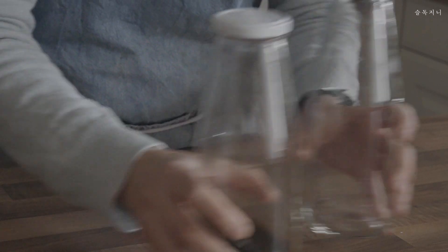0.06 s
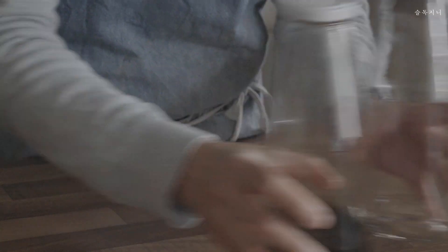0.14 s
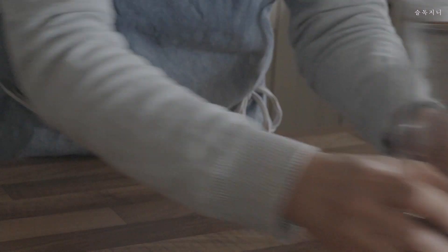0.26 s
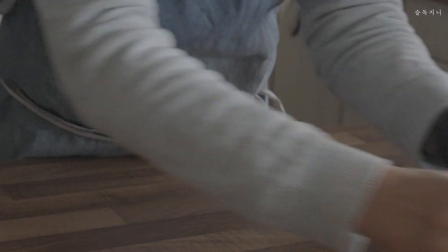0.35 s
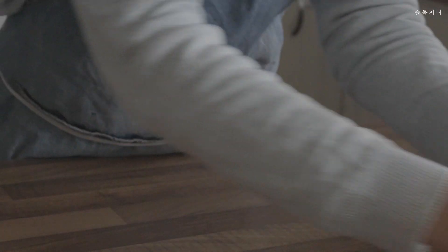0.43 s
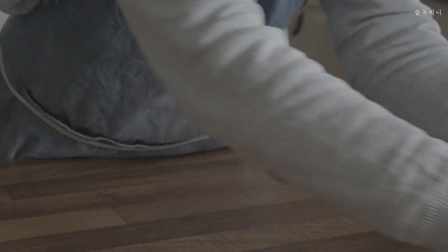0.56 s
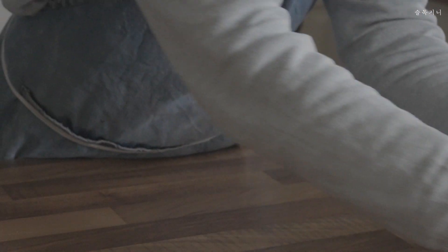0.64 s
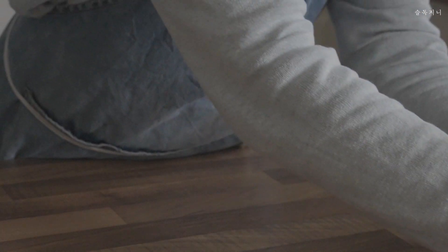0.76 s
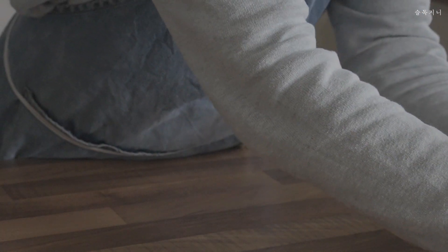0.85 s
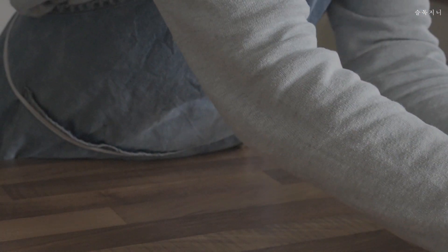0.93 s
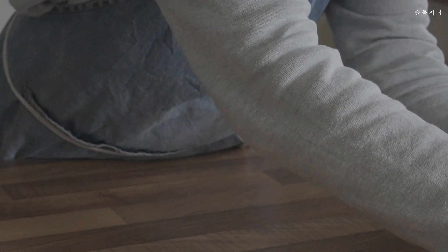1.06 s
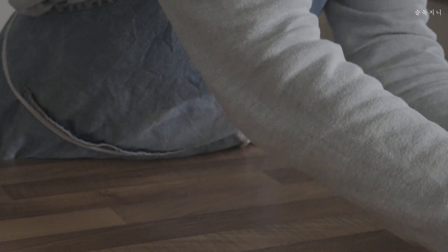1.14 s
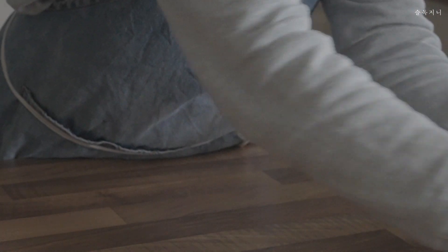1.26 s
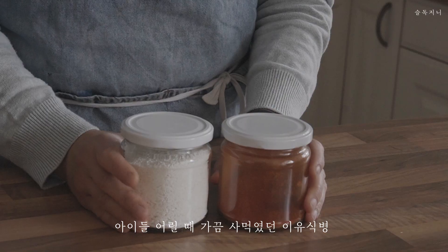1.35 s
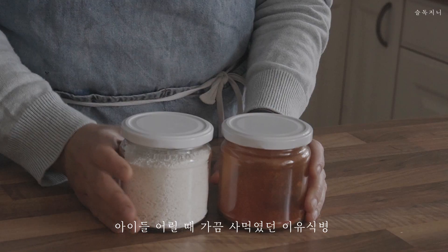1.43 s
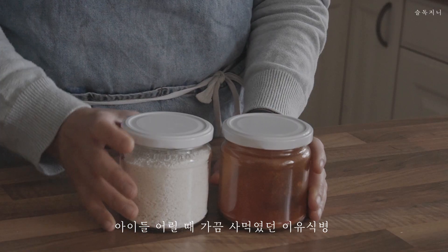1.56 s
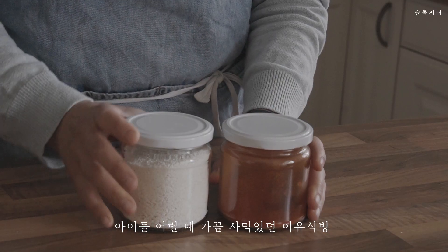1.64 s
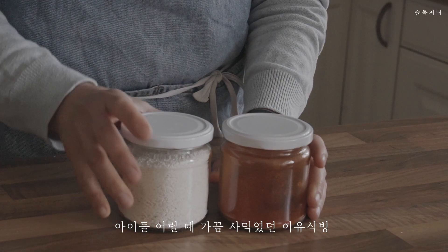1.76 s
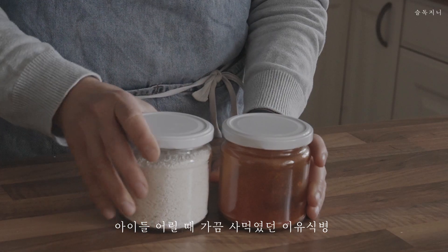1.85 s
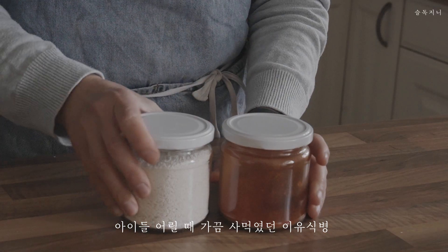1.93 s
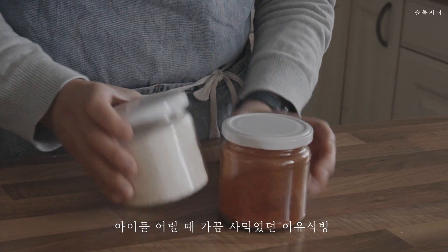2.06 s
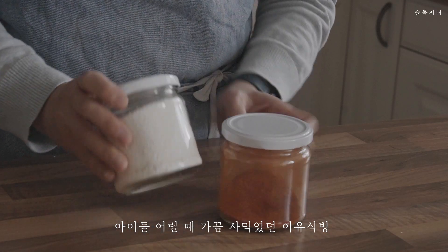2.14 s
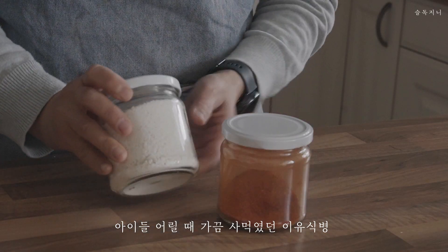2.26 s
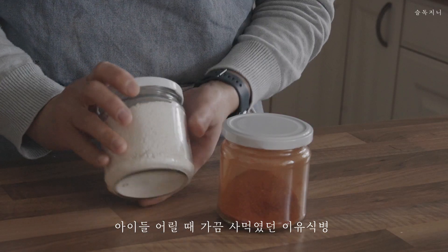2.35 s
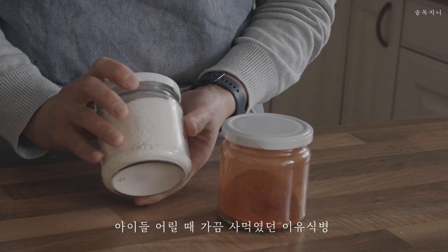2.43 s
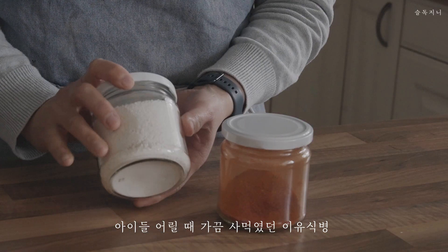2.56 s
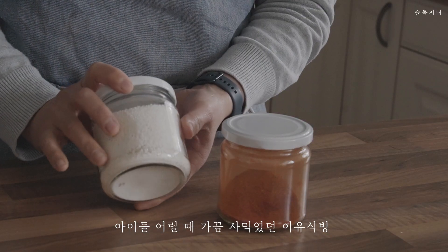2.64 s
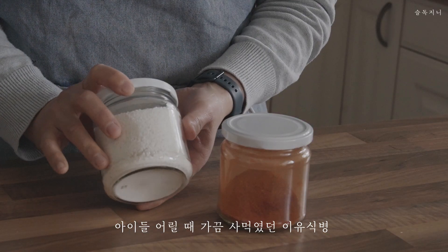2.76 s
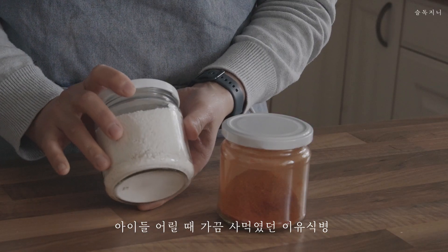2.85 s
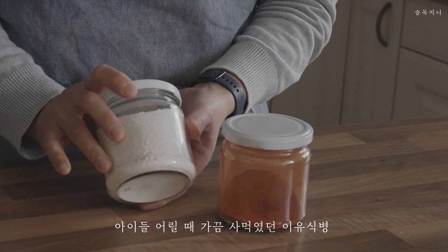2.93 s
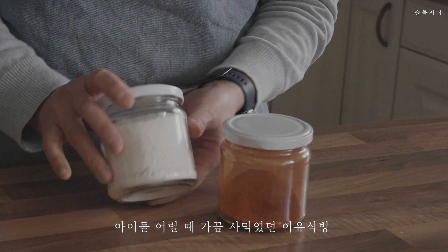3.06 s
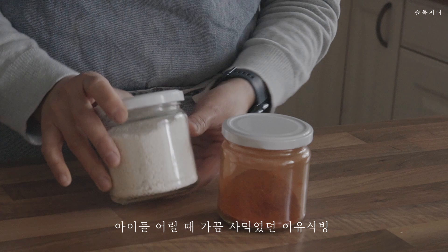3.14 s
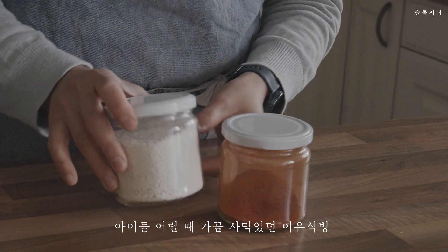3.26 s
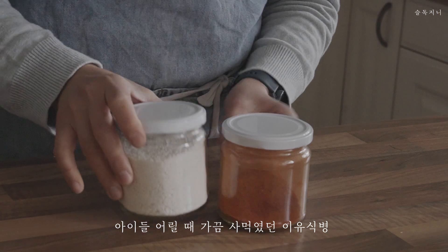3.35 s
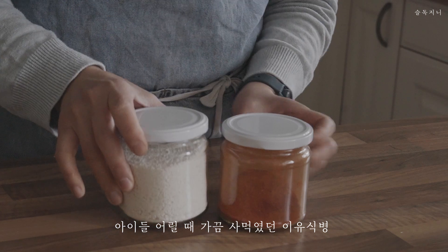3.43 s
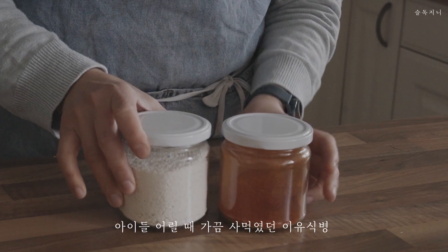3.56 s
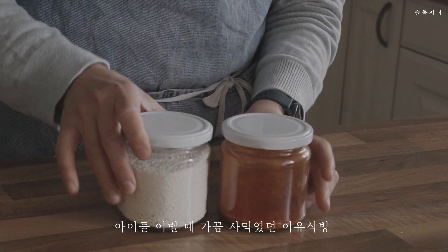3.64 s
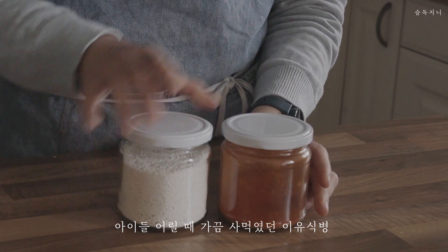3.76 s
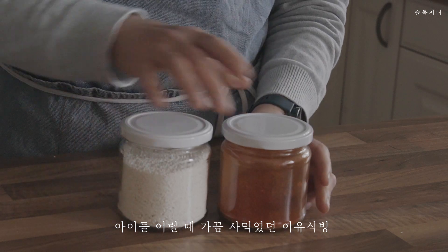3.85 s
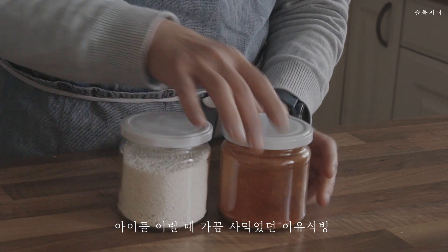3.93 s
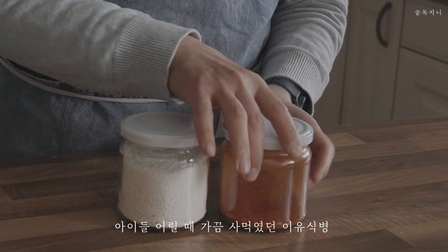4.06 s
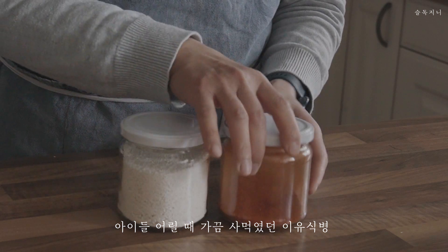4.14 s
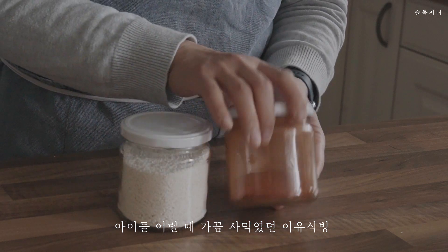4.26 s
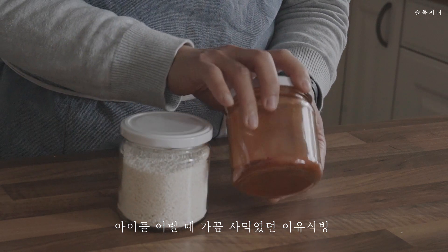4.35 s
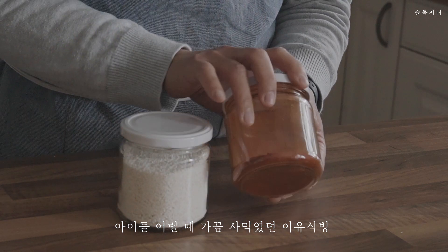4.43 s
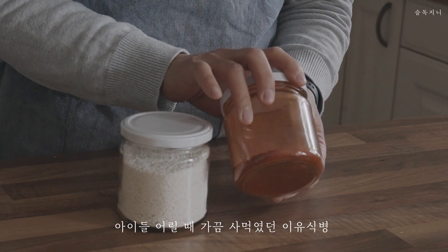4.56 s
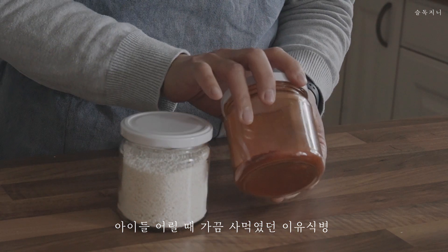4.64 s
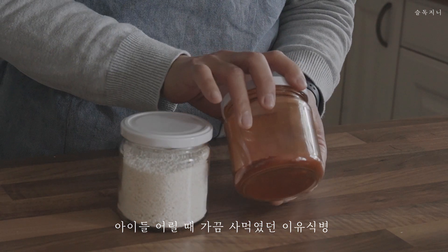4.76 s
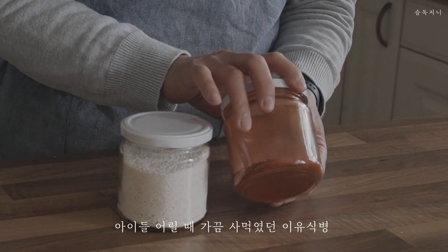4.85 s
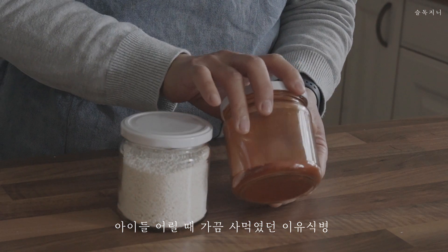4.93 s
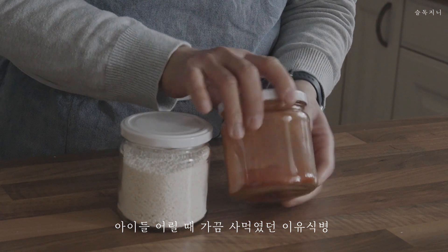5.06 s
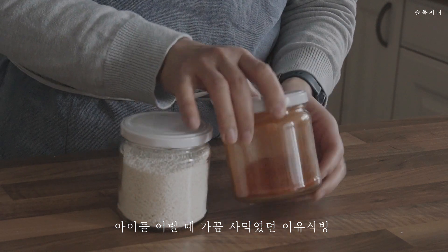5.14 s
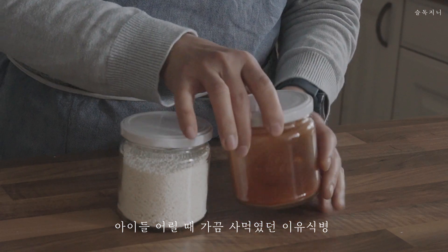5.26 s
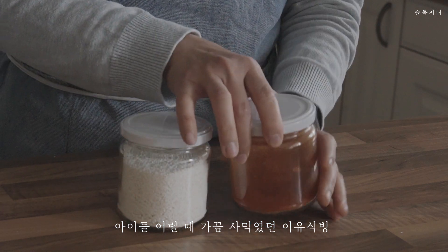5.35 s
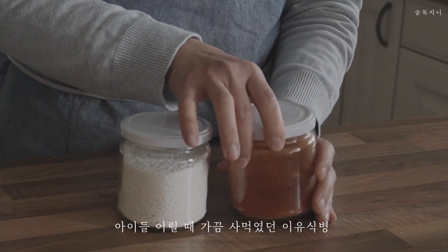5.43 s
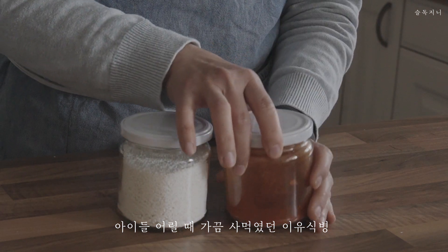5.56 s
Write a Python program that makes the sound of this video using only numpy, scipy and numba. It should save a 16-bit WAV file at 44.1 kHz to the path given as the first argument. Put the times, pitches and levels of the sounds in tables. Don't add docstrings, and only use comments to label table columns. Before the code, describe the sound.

Glass vessels are handled on a wooden worktop, heard very close with a short room ring. After an opening scrape and cloth rubbing, bottles are set down in a bouncing cluster of knocks and tiny clinks. A filled jar leaves the board lightly, returns with two hard distorted bangs and a slide, then its neighbour scrapes and clacks as it is picked up. Fabric rustles to the end.

```python
import sys
import numpy as np
from scipy import signal
from scipy.fft import rfft, irfft
from scipy.io import wavfile
from scipy.ndimage import uniform_filter1d
from numba import njit

SR = 44100
rng = np.random.default_rng(int(sys.argv[2]) if len(sys.argv) > 2 else 0)


def master(y):
    cut = np.clip(np.atleast_2d(y).T, -1, 1)
    pcm = np.round(cut * 32767)
    wavfile.write(sys.argv[1], SR, pcm.astype(np.int16))


def elevation(decibels):
    levels = np.asarray(decibels, float)
    return 10 ** (levels / 20)


N = 246959
LEAD = SR // 10


def unit(x):
    return x / np.sqrt(np.mean(x ** 2))


def noise(spectrum):
    hz, db = np.transpose(spectrum)
    f = np.arange(1, N // 2 + 2) * SR / N
    colour_db = np.interp(np.log(f), np.log(hz), db, -120, -120)
    return unit(irfft(rfft(rng.standard_normal(N)) * elevation(colour_db), N))


def walk(rate_hz):
    k = int(SR / rate_hz)
    held = np.repeat(rng.standard_normal(N // k + 1), k)
    return uniform_filter1d(uniform_filter1d(held, k), k)[:N]


def modes(table):
    t = np.arange(SR) / SR
    response = 0
    for k, (hz, db, t60_s) in enumerate(table):
        decay = 1000. ** (-t / t60_s)
        response = response + (-1) ** k * elevation(db) * np.sin(2 * np.pi * hz * t) * decay
    return response


def through(x, response):
    return signal.fftconvolve(x, response)[:len(x)]


def add(track, s, x):
    i = int(s * SR) + LEAD
    track[i:i + len(x)] += x[:len(track) - i]


def strikes(table):
    track = np.zeros(N + LEAD)
    for s, db in table:
        add(track, s, elevation([db]))
    return track


def thud(hz, cycles, edge_db, push=0.17):
    t = np.arange(SR // 40) / SR
    contact = 1 - np.exp(-(t * hz / push) ** 2)
    board = contact * np.sin(2 * np.pi * hz * t - 1.6) * np.exp(-(t * hz / cycles) ** 2)
    rim = modes([(2150, 10, .004), (3350, 2, .003), (5000, 2, .002), (6500, -3, .002), (8500, -9, .002)])
    return 1.3 * board + elevation(edge_db) * rim[:len(t)] * (1 - np.exp(-t / .0001))


def knocks():
    # time_s, blow_db, thud_hz, ring_db (as in the four tables below)
    slams = [
        (.9459, 6, 600, -10.5),
        (1.361, 5.5, 676, -17.5),
        (3.5178, 12, 690, -15.5),
        (3.6497, 12, 783, -19.5),
    ]
    taps = [(-.03, -14.5, 418, -5.5), (0.972, -2.5, 374, -14), (0.987, -11, 420, -3.5),
            (1.026, -8, 495, -12.5), (1.087, -17, 301, -5), (1.147, -5.5, 593, -12),
            (1.175, -7.5, 566, -21.5), (1.253, -26, 333, -7.5), (1.355, -12, 410, -4),
            (3.547, -10, 660, -4.5), (3.686, -2.5, 643, -20), (3.841, -23.5, 617, -21)]
    lifts = [
        (1.877, -24, 595, -13.5),
        (1.882, -19, 616, -14),
        (1.893, -12, 670, -31),
        (1.945, -24, 700, -29),
        (1.981, -17.5, 333, -25.5),
        (1.984, -19, 680, -27.5),
        (4.15, -21, 480, -18),
        (4.189, -11, 418, -30),
        (4.241, -34, 406, -28),
    ]
    ticks = [
        (2.6962, -22, 1020, -25),
    ]
    clacks = [
        (4.1795, -3, 470, -26),
    ]
    kinds = [(clacks, 0.68, -22, 4500), (slams, 1, -29.5, 19000), (taps, 1.4, -23, 9200),
             (lifts, 1.66, -13, 4100), (ticks, 1.7, -12, 9400)]
    edge_db_per_db = 0.49
    click_db = -12
    sound_lag_s = .0015
    direct, sent, blows = np.zeros((3, N + LEAD))
    for table, cycles, edge_db, top_hz in kinds:
        soften = signal.butter(2, top_hz, fs=SR, output="sos")
        for s, db, hz, ring_db in table:
            x = elevation(db) * thud(hz, cycles, edge_db + edge_db_per_db * db)
            x = signal.sosfilt(soften, x)
            heard_s = s + sound_lag_s
            add(direct, heard_s, x)
            add(sent, heard_s, x * elevation(ring_db + 14))
            add(sent, heard_s, elevation([db + ring_db + click_db]))
            add(blows, heard_s, elevation([db + ring_db]))
    bass_cut = signal.butter(2, 170, "highpass", fs=SR, output="sos")
    return signal.sosfilt(bass_cut, direct), sent, blows


def worktop(direct):
    # pitch_hz, level_db, t60_s
    wood_modes = [(85, -3, .12), (160, -2, .09), (300, -4, .07), (480, -6, .06), (660, -6, .05),
                  (985, -12, .04), (1550, -9, .03), (1900, -8, .03)]
    return elevation(-41) * through(direct, modes(wood_modes))


def ring(rise_ms):
    # centre_hz, level_db, t60_s
    room_bands = [(80.7, 4, 0.57), (130.6, 6, 0.23), (275, 7, 0.35), (471, 1, 0.32), (799, 3, 0.38),
                  (1223, 5, 0.38), (2070, -3, 0.46), (3780, 2, 0.55), (4500, -4, 0.32), (7500, 1, 0.47),
                  (11000, -3, 0.36)]
    t, out = np.arange(SR) / SR, 0
    for hz, db, t60_s in room_bands:
        sos = signal.butter(2, [hz / 1.33, hz * 1.18], "bandpass", fs=SR, output="sos")
        band = signal.sosfilt(sos, rng.standard_normal(SR))
        out = out + elevation(db) * unit(band) * np.sqrt(hz / 500) * 1000. ** (-t / t60_s)
    out = out * (1 - np.exp(-t * 1000 / rise_ms))
    return out / np.sqrt(np.sum(out ** 2))


def vessels(blows):
    # time_s, level_db
    bottle_blows = [
        (-.03, -20.5),
        (.949, -3.5),
        (.989, -2),
        (1.028, -7.5),
        (1.089, -17.5),
        (1.149, -6.5),
        (1.177, -45),
    ]
    # time_s, level_db
    jar_blows = [
        (4.192, -19),
        (4.243, -20.5),
    ]
    # pitch_hz, level_db, t60_s
    bottle_notes = [(228.5, -12.5, 0.32), (283.5, -5.5, 0.65), (374, -4.5, 0.24), (441, -9, 0.18),
                    (513.4, -13, 0.31), (662, -9, 0.31), (957, -12, 0.096)]
    full_jar_notes = [(401.6, -6.5, 0.28), (480, -6, 0.25), (554, -10, 0.42), (614, -12, 0.55),
                      (675, -9, 0.18), (818, -12, 0.31), (875, -22, 0.67), (974, -1.5, 0.13)]
    lifted_jar_notes = [(239, -13, 0.19), (402, 0, 0.44), (686, -20, 0.29)]
    s = (np.arange(len(blows)) - LEAD) / SR
    bottles = through(strikes(bottle_blows), modes(bottle_notes))
    full_jars = through(blows * (s > 1.3) * (s < 3.9), modes(full_jar_notes))
    lifted_jar = through(strikes(jar_blows), modes(lifted_jar_notes))
    return bottles + full_jars + lifted_jar


def kitchen():
    # pitch_hz, density_db (per Hz)
    room_colour = [(12, -55), (21, 9), (44, -14), (168, -10), (337, -20.5), (949, -18.5), (1810, -30),
                   (16000, -37.5)]
    return elevation(-46) * noise(room_colour)


def cloth():
    # middle_s, length_s, rub_db, hiss_above_rub_db
    strokes = [(0.055, 0.058, -45, 5), (0.107, 0.6, -45.5, -15), (0.465, 0.92, -43.5, -2.5),
               (1.593, 0.28, -48, -12.5), (1.84, 0.22, -48, -7.5), (2, 0.099, -58.5, 9),
               (2.1, 0.48, -46.5, -4), (2.369, 0.2, -43, -2), (2.577, 0.43, -50.5, -8),
               (2.805, 0.34, -55, -5), (3.083, 0.078, -68, 13), (3.284, 0.61, -46.5, -5.5),
               (3.992, .1, -50.5, 0), (4.103, 0.71, -46, -7.5), (4.7, 0.98, -58.5, -31),
               (5.24, 0.43, -48.5, -5), (5.43, 0.17, -52.5, -3), (5.58, 0.18, -51, -16)]
    # pitch_hz, density_db (per Hz)
    rub_colour = [(24, -36), (40, 6), (92, -7), (125, -7.5), (450, -5.5), (679, -4), (4000, -21),
                  (6500, -56)]
    hiss_colour = [(1180, -5), (2000, -1.5), (2320, -5.5), (6310, -9.5), (8330, -9.5), (10500, -19.5),
                   (14000, -18), (16000, -31)]
    flicker_db = 1.8
    t = np.arange(N) / SR
    coarse_t = t[::100]
    middle_s, length_s, rub_db, hiss_db = np.transpose(strokes)[:, :, None]
    swell = np.exp(-(2 * (coarse_t - middle_s) / length_s) ** 2) ** 2

    def envelope(db):
        return np.interp(t, coarse_t, np.sqrt(np.sum(swell * elevation(2 * db), axis=0)))

    hiss = envelope(rub_db + hiss_db) * noise(hiss_colour) * elevation(flicker_db * walk(25.07))
    rub = envelope(rub_db) * noise(rub_colour) * elevation(flicker_db * walk(14))
    return hiss + rub


def drags():
    # loudest_s, build_up_s, level_db, board_note_hz, bright_share_db
    pulls = [
        (.058, 0.056, -34, 394, 2.5),
        (1.356, .02, -20, 450, -11.5),
        (1.895, 0.02, -22, 591, -7.5),
        (3.7, .03, -10.5, 638, -15),
        (3.992, 0.023, -36.5, 410, -12.5),
        (4.102, 0.033, -21, 480, -11),
        (4.17, 0.046, -22, 430, -8.5),
        (5.262, .02, -50.5, 620, 3.5),
    ]
    # pitch_hz, level_db, t60_s
    base_notes = [(935, 1.5, 0.014), (1510, 0.5, 0.02), (1874, -6, 0.025), (2330, -12.5, 0.028),
                  (2780, -18, 0.05), (3270, -9, 0.0099), (4540, -18, 0.0084)]
    slips_per_s, rise_db, fade_db_per_s = 2500, 15.5, 404
    out, t = np.zeros(N + LEAD), np.arange(SR // 5) / SR
    for s, rise_s, db, hz, bright_db in pulls:
        slips = (rng.random(len(t)) < slips_per_s / SR) * rng.standard_normal(len(t)) + 1e-9
        low = through(slips, modes([(hz, 0, .035), (1.644 * hz, -5, .025)]))
        high = through(slips, modes(base_notes))
        down_db = np.maximum(rise_db * (1 - t / rise_s), fade_db_per_s * (t - rise_s))
        envelope = np.minimum(1, t / 0.0048) * elevation(db - down_db)
        add(out, s - rise_s, envelope * (unit(low) + elevation(bright_db) * unit(high)))
    return out


def booms():
    # start_s, level_db, pitch_hz
    bounces = [
        (.008, -16, 158.4),
        (1.884, -21.5, 168),
        (1.983, -31.5, 105),
        (3.986, -39, 99),
        (4.178, -27.5, 120),
    ]
    t60_s, rise_s = 0.18, 0.002
    out, t = np.zeros(N + LEAD), np.arange(SR) / SR
    for s, db, hz in bounces:
        add(out, s, modes([(hz, db, t60_s)]) * (1 - np.exp(-t / rise_s)))
    return out


def touching_glass():
    # time_s, level_db
    clinks = [
        (.952, -39),
        (.99, -45),
        (1.027, -47.5),
        (1.125, -59),
        (1.186, -48.5),
    ]
    # pitch_hz, level_db, t60_s
    clink_notes = [(3480, -8, .1), (5370, -10, .1), (7390, 0, .15), (13000, -11, .15)]
    chatter_notes = [(3700, -2, .05), (5450, -2, .05), (5950, 0, .05), (6800, 0, .06), (8800, 0, .08),
                     (10000, -4, .03), (11200, -4, .01), (12500, -5, .03), (13700, -6, .03)]
    start_s, end_s, hits_per_s, chatter_db = 1.18, 1.3, 900, -64
    s = (np.arange(N + LEAD) - LEAD) / SR
    swell = (1 - np.abs(2 * (s - start_s) / (end_s - start_s) - 1)).clip(0)
    hits = (rng.random(len(s)) < hits_per_s / SR) * rng.standard_normal(len(s)) * swell
    chatter = elevation(chatter_db) * through(hits, modes(chatter_notes))
    return through(strikes(clinks), modes(clink_notes)) + chatter


def scene():
    direct, sent, blows = knocks()
    scrape = drags()
    ringing = through(sent + elevation(-18) * scrape, ring(rise_ms=0.67))
    glass = vessels(blows) + touching_glass()
    near = direct + worktop(direct) + scrape + ringing + glass + booms()
    return (near[LEAD:] + cloth() + kitchen())[None]


@njit
def limiter_gain(x, top, attack, release):
    gain, e = np.empty(len(x)), top
    for i in range(len(x)):
        a = max(abs(x[i]), top)
        e += (a - e) * (attack if a > e else release)
        gain[i] = top / e
    return gain


def band_limit(x):
    return signal.sosfilt(signal.butter(12, 16800, fs=SR, output="sos"), x)


def record(dry):
    late, knee = int(.0015 * SR), 5
    gain = limiter_gain(dry[0], .55, 1 / (.0006 * SR), 1 / (.021 * SR))
    fade_in = np.minimum(1, np.arange(N) / late)
    held = dry * np.roll(gain, late) * fade_in
    saturated = held / (1 + np.abs(held) ** knee) ** (1 / knee)
    return band_limit(saturated)


dry = scene()
out = record(dry)
master(out)
```